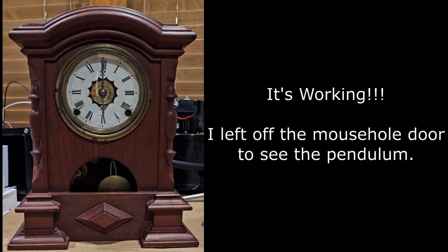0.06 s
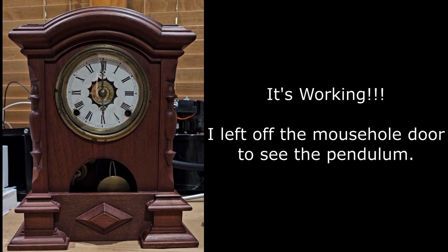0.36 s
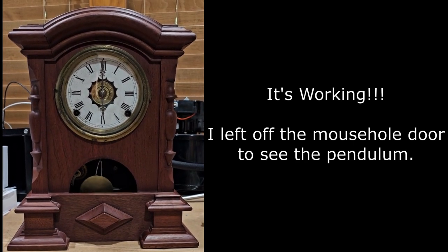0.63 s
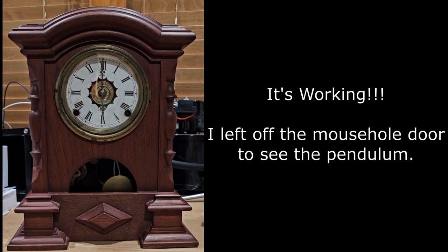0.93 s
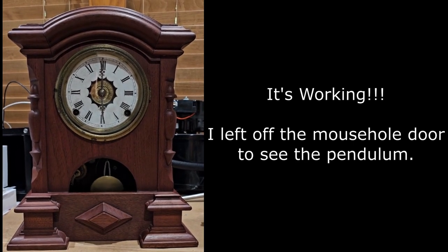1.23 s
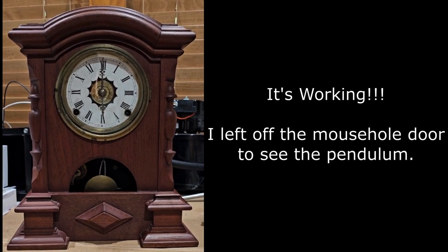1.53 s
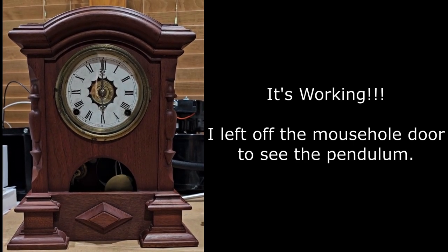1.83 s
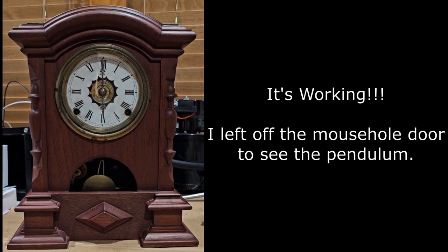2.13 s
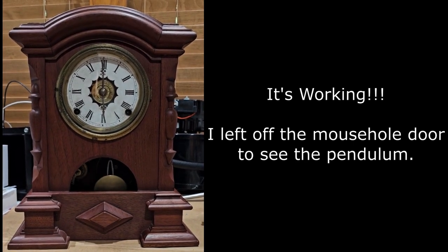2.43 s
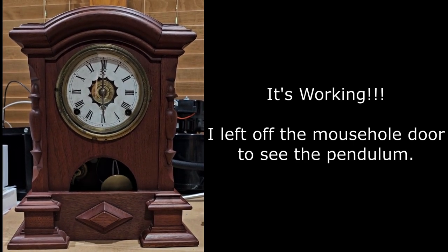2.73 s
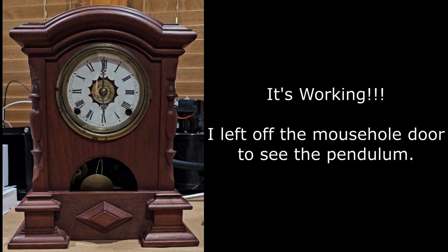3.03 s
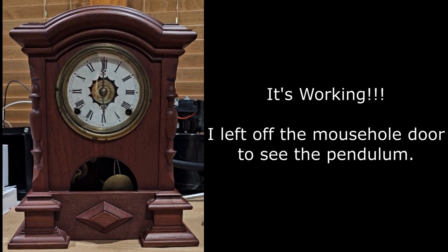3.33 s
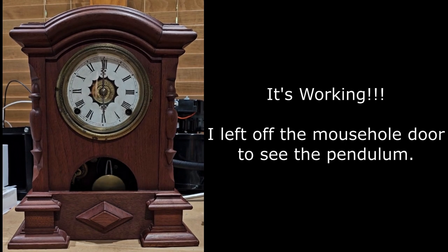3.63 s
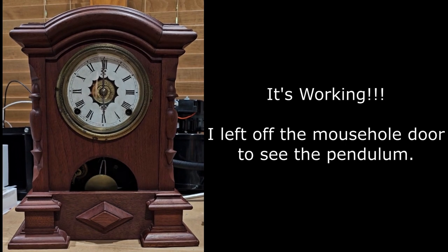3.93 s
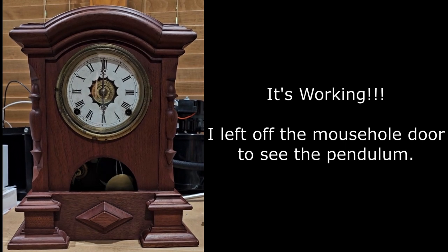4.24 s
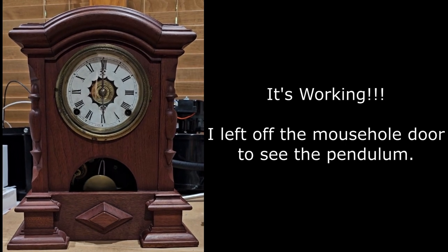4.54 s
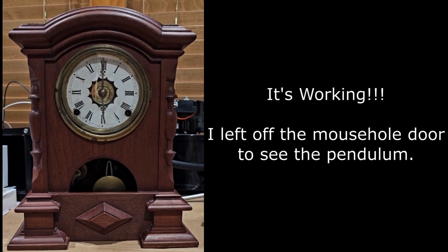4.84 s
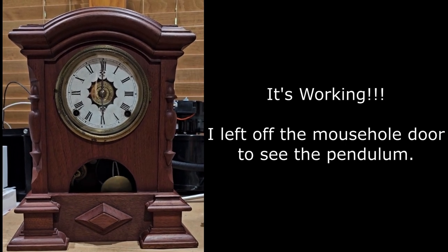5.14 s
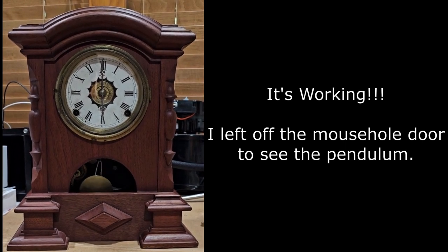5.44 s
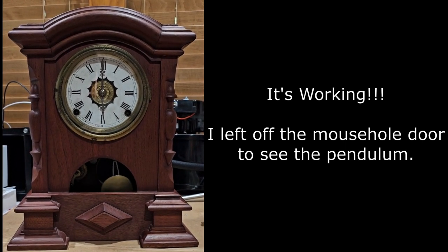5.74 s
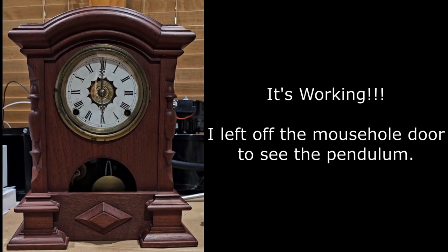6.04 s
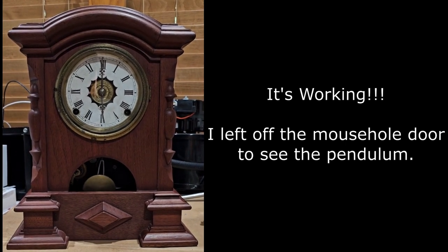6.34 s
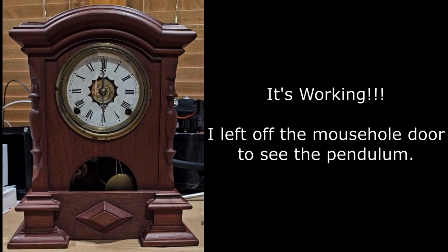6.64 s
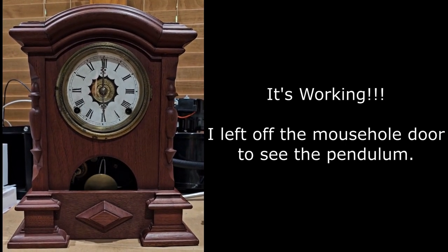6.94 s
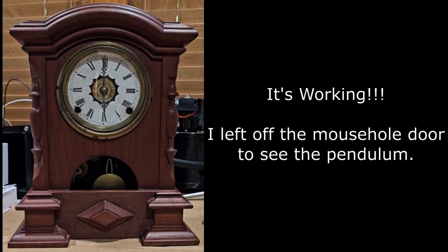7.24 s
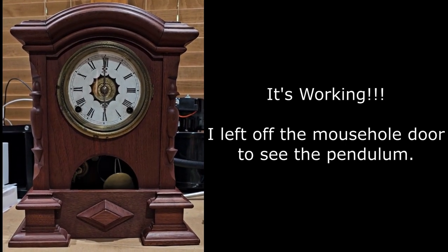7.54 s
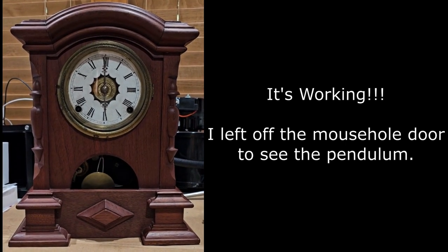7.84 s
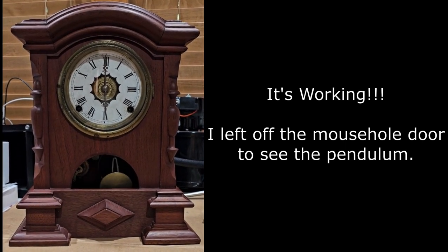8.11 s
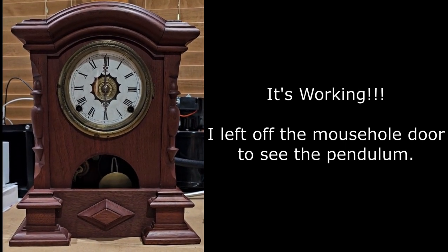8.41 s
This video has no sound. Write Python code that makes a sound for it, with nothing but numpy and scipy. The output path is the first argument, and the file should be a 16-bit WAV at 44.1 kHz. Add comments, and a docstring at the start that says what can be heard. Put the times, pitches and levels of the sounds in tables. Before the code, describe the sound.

Gears rattle and whir into motion inside a wooden mantel clock, heard up close over a faint room hush. Six evenly spaced strokes follow on a small, bright bell, each one with a woody knock. After the sixth, a short clatter ends the whirring, and the ring slowly fades. A quick, steady tick-tock runs underneath and carries on to the end.

```python
"""A quiet room, close to an antique wooden mantel clock that strikes six on a small bell.
The strike train spins up, gears and fan whirring. At each stroke the hammer knocks the case and
rings the bell; after the sixth, the train locks with a clatter. The pendulum's escapement
ticks throughout and goes on while the last stroke dies away."""
import sys
import numpy as np
from scipy import signal
from scipy.fft import rfft, irfft
from scipy.io import wavfile

SR = 44100
rng = np.random.default_rng(int(sys.argv[2]) if len(sys.argv) > 2 else 0)


def dump(signal):
    """Clip the signal to [-1, 1] and save it as 16-bit WAV at the path in sys.argv[1]."""
    limited = np.clip(np.atleast_2d(signal).T, -1, 1)
    pcm = np.round(limited * 32767).astype(np.int16)
    wavfile.write(sys.argv[1], SR, pcm)


N = 382345
PENDULUM_PERIOD_S, ROOM_T60_S = 0.803, 0.45


def amp(db):
    """Decibels to gain."""
    return 10 ** (np.asarray(db) / 20)


def decay(t, t60_s):
    """Envelope falling 60 dB in t60_s."""
    return 1e-3 ** (t / t60_s)


def lookup(table, hz):
    """Table value on a log-frequency axis."""
    table_hz, values = np.transpose(table)
    return np.interp(np.log(hz + 1), np.log(table_hz + 1), values)


def add(mix, start_s, sound):
    """Add a stereo sound to the mix at start_s."""
    part = mix[:, max(round(start_s * SR), 0):][:, :sound.shape[1]]
    part += sound[:, :part.shape[1]]


# Clock's stereo balance: (frequency [Hz], left minus right [dB])
BALANCE = [(100, 1), (200, -1), (380, -2), (700, 5), (1290, -3), (2380, -3), (4400, 3), (15000, 5.5)]

def pan_db(hz):
    """Left and right level offsets of the clock."""
    return np.outer([0.5, -0.5], lookup(BALANCE, hz))


# Wooden case and brass plates: (frequency [Hz], width [Hz], lift [dB])
CASE_RESONANCES = [(160, 22, 10.5), (225.5, 61, 11), (262, 14, 0), (320, 100, 9.5), (546, 98, 11),
                   (689.3, 117, 16), (744, 64, 12.5), (825, 40, 9), (1050, 10, 10), (1459, 53, 8),
                   (1613, 484, 14.5), (1840, 90, 2.5), (2101, 100, 13), (3980, 400, 5.5), (5500, 420, 7.5),
                   (7700, 810, -1.5), (11300, 510, -6)]
# Clock's stereo image: (frequency [Hz], left-right correlation [ratio])
CLOCK_CORRELATION = [(60, 1), (280, 1), (640, 0.75), (1400, 0.51), (3000, 0.23), (15000, 0.2)]

def noise_spectrum(spectrum, case_share, size, correlation=CLOCK_CORRELATION, ripple_db=3, ripple_hz=14):
    """Frequencies and stereo noise spectrum, coloured by the case and the room's standing waves."""
    hz = np.fft.rfftfreq(size, 1 / SR)
    left, independent = rfft(rng.standard_normal((2, size))) * np.sqrt(SR / 2)
    shared = lookup(correlation, hz)
    right = shared * left + np.sqrt(1 - shared ** 2) * independent
    lift_db = sum(db / (1 + (2 * (hz - centre) / width) ** 2) for centre, width, db in CASE_RESONANCES)
    ripple = np.interp(hz / ripple_hz, np.arange(len(hz)), rng.standard_normal(len(hz)))
    level_db = lookup(spectrum, hz) + case_share * lift_db + ripple_db * ripple + pan_db(hz)
    return hz, np.array([left, right]) * amp(level_db)


# Room air: (frequency [Hz], density [dB re 1/Hz])
AIR_SPECTRUM = [(20, -83.5), (60, -82.5), (120, -91.5), (250, -85), (380, -102), (520, -98.5), (800, -102),
                (1250, -101), (2000, -103), (3000, -110), (6000, -119), (9000, -130), (15500, -137)]
# Air's stereo image: (frequency [Hz], left-right correlation [ratio])
AIR_CORRELATION = [(60, 0.92), (280, 0.94), (640, 0.35), (1400, 0), (15000, 0)]

def room_air():
    """Steady low hush of the room."""
    _, noise = noise_spectrum(AIR_SPECTRUM, case_share=0, size=N, correlation=AIR_CORRELATION)
    return irfft(noise, N)


# Strike train, sagging as it lifts the hammer: (time [s], speed [teeth/s])
TRAIN_SPEED = [(0, 33.4), (.25, 26.8), (.45, 31.9), (1.1, 39.9), (1.6, 40.2), (2.3, 35.3), (2.7, 40.6),
               (3.4, 41.1), (3.85, 38.4), (4.3, 40.8), (4.95, 37.3)]

def train_motion(release_s=-0.06, spin_up_s=0.26, lock_s=5.13, coast_s=0.27, coast_db=-15, stop_s=0.04):
    """Teeth passed and gain of the train: it spins up, runs and locks; the fan slips on briefly."""
    t = np.arange(N) / SR
    speed = np.interp(t, *np.transpose(TRAIN_SPEED))
    speed_gain = amp(8.5 * np.log2(speed / 40))  # 8.5 dB per doubling
    spin_up = 1 - np.exp(-(t - release_s) / spin_up_s)
    running, coasting = (np.exp(-np.maximum(t - end, 0) / stop_s) for end in (lock_s, lock_s + coast_s))
    return np.cumsum(speed) / SR, speed_gain * spin_up * np.maximum(running, amp(coast_db) * coasting)


# Gears and fan before case colouring: (frequency [Hz], density [dB re 1/Hz])
WHIRR_SPECTRUM = [(50, -112), (120, -97.5), (200, -90), (450, -96), (1000, -89.5), (2000, -92), (2800, -93),
                  (4500, -93), (6500, -99), (10000, -105), (15500, -109)]

def train_whirr(teeth, gain, chatter_share=0.36, tooth_spread_db=2.6, split_hz=2400):
    """Gears and fan whirr through the case; each tooth sets off a short uneven rattle."""
    grain_db = 3 * np.interp(np.arange(N) / SR * 500, np.arange(N), rng.standard_normal(N))
    tooth_phase = teeth % 1
    contact = np.exp(-tooth_phase / 0.26) * (1 - np.exp(-tooth_phase / 0.08))
    chatter = contact * amp(tooth_spread_db * rng.standard_normal(N)[teeth.astype(int)] + grain_db)
    chatter_power = chatter ** 2 / np.mean(chatter ** 2)
    hz, noise = noise_spectrum(WHIRR_SPECTRUM, case_share=1, size=N)
    low = 1 / (1 + (hz / split_hz) ** 4)
    out = np.zeros((2, N))
    # Ringing wood smooths the low band's chatter.
    for band, share in ((low, 0.33 * chatter_share), (1 - low, chatter_share)):
        out += irfft(noise * band, N) * np.sqrt(1 - share + share * chatter_power)
    return out * gain


def blow(spectrum, t60s, rise_s, case_share, room_db, room_t60_s=ROOM_T60_S, size=24000):
    """A blow on the case: dense modes die band by band, and the room answers faintly."""
    hz, noise = noise_spectrum(spectrum, case_share, size)
    t, out = np.arange(size) / SR, np.zeros((2, size))
    centres_hz = np.geomspace(125, 16000, 8)
    for centre_hz, weights in zip(centres_hz, np.eye(len(centres_hz))):
        band = irfft(noise * np.interp(np.log(hz + 1), np.log(centres_hz), weights))
        direct = decay(t, lookup(t60s, centre_hz))
        reverb = amp(room_db) * decay(t, room_t60_s / (1 + centre_hz / 12000))
        attack = 1 - np.exp(-t / (rise_s + 1 / centre_hz))  # bass builds more slowly
        out += band * np.hypot(direct, reverb) * attack
    return out


# Tooth rattle decay: (frequency [Hz], t60 [s])
TOOTH_DECAY = [(200, 0.035), (1500, 0.043), (4000, 0.1), (14000, 0.058)]

def loose_teeth(teeth, gain, count=36, settle_s=0.51, fade_db_per_s=15):
    """Single teeth rattle while the train gathers speed, and fade as it settles."""
    out = np.zeros((2, N))
    for sample in np.flatnonzero(np.diff(np.floor(teeth)))[:count]:
        start_s = sample / SR
        db = 6 - fade_db_per_s * max(start_s - settle_s, 0) + rng.uniform(-1, 1)
        rattle = blow(WHIRR_SPECTRUM, TOOTH_DECAY, rise_s=0.003, case_share=0.99,
                      room_db=-27, room_t60_s=0.27, size=6000)
        add(out, start_s, gain[sample] * amp(db) * rattle)
    return out


# Wooden panels: (frequency [Hz], level [dB], t60 [s])
PANEL_MODES = [(176.6, -47, 0.61), (214.7, -37.5, 0.22), (270, -50.5, .25), (327, -43.5, .2),
               (642, -35.5, 0.17), (665, -36, 0.12), (836, -47.5, 0.27), (1057, -47, 0.28)]

def case_ring(hardness_hz, rise_s=0.0021, size=22000):
    """The struck panels ring; modes above hardness_hz are excited less."""
    t, out = np.arange(size) / SR, np.zeros((2, size))
    for hz, db, t60_s in PANEL_MODES:
        gain = amp(db + pan_db(hz)) / (1 + (hz / hardness_hz) ** 2)
        out += gain * np.sin(2 * np.pi * (hz * t + rng.random())) * decay(t, t60_s)
    return out * (1 - np.exp(-t / rise_s))


# Tick, light pallet touch, tock: (time in swing [s], click [dB], brass ring [dB], case thud [dB])
SWING_BEATS = [(0, -0.5, -0.3, -16), (0.332, -22.5, -12.5, -24.5), (0.405, -3, -18, -10.5)]
# Click before case colouring: (frequency [Hz], density [dB re 1/Hz])
CLICK_SPECTRUM = [(50, -115), (200, -88.5), (450, -92), (800, -91.5), (1200, -90), (2500, -81.5),
                  (4500, -96), (6500, -100), (10000, -107), (15500, -113)]
# Click decay: (frequency [Hz], t60 [s])
CLICK_DECAY = [(200, 0.38), (700, 0.25), (2000, 0.098), (5000, 0.097), (14000, 0.13)]
# Brass rung by a beat: (frequency [Hz], level [dB], t60 [s], delay [s])
BRASS_MODES = [(775, -38.5, 0.087, .001), (1710, -46.5, 0.055, .002), (2030, -46.5, 0.088, .009),
               (5475, -51, 0.055, 0.011), (7490, -62, .03, .001), (8550, -59, .04, .010),
               (10900, -63, 0.026, .009)]

def escapement(first_tick_s=0.527, force_spread_db=1.1):
    """Teeth land on the pallets each swing: one rings the brass more, the other thuds in the wood."""
    t, out = np.arange(SR // 5) / SR, np.zeros((2, N))
    brass_attack = 1 - np.exp(-t / 0.0028)
    swings_s = np.arange(first_tick_s - PENDULUM_PERIOD_S, N / SR, PENDULUM_PERIOD_S)
    beats = [(swing_s + offset_s, *levels) for swing_s in swings_s for offset_s, *levels in SWING_BEATS
             if 0 < swing_s + offset_s < N / SR]
    for start_s, click_db, ring_db, thud_db in beats:
        force = amp(force_spread_db * rng.standard_normal())
        click = blow(CLICK_SPECTRUM, CLICK_DECAY, rise_s=0.00089, case_share=0.811, room_db=-11)
        add(out, start_s, force * amp(click_db) * click)
        add(out, start_s, force * amp(thud_db) * case_ring(hardness_hz=450))
        for hz, mode_db, t60_s, delay_s in BRASS_MODES:
            gain = amp(mode_db + ring_db + rng.standard_normal() + pan_db(hz))
            ring = np.sin(2 * np.pi * hz * t) * decay(t, t60_s) * brass_attack
            add(out, start_s + delay_s, force * gain * ring)
    return out


# Lever drops and hammer bounces: (time [s], level [dB], rise [s], case thump re level [dB])
MECHANISM_CLACKS = [(0.560, -13, .002, 1), (1.130, -17, 0.0019, 0), (1.184, -17.5, .002, 0),
                    (5.013, -5, .004, 0.5), (5.031, 2.5, 0.0019, 1), (5.046, -6.5, 0.0012, 2),
                    (5.101, -24, 0.0027, 1), (5.171, -19, 0.0009, -6), (5.241, -7, 0.0012, 6),
                    (5.392, -20, .003, 5.5)]
# Clack before case colouring: (frequency [Hz], density [dB re 1/Hz])
CLACK_SPECTRUM = [(50, -105), (130, -83), (250, -71.5), (500, -75), (750, -77.5), (1500, -72.5),
                  (2800, -71.5), (4500, -78.5), (7500, -79), (11000, -79), (15500, -92)]
# Clack decay: (frequency [Hz], t60 [s])
CLACK_DECAY = [(150, 0.39), (700, 0.12), (2500, 0.29), (14000, 0.076)]

def mechanism_clacks():
    """Levers and the rebounding hammer clack and thump the case."""
    out = np.zeros((2, N))
    for start_s, db, rise_s, thump_db in MECHANISM_CLACKS:
        clack = blow(CLACK_SPECTRUM, CLACK_DECAY, rise_s, case_share=0.67, room_db=-17)
        add(out, start_s, amp(db) * clack)
        add(out, start_s, amp(db + thump_db) * case_ring(hardness_hz=1494))
    return out


# Strokes: (time [s], knock [dB], bell ring [dB], tilt above prime [dB/octave], twin partial [dB])
HAMMER_STROKES = [(0.8906, 2, -1.96, 4, -0.5), (1.7070, 1.7, 0.1, 0.64, -2), (2.5580, 3, -1.14, 2, 4.5),
                  (3.3535, 3, -2, 3.5, 6.5), (4.1557, 3, -3.5, 4.4, 1), (4.9710, 2, 0.68, -0.8, -1.5)]
# Knock before case colouring: (frequency [Hz], density [dB re 1/Hz])
KNOCK_SPECTRUM = [(50, -100), (130, -66), (220, -66), (480, -70.5), (750, -70), (1200, -73.5),
                  (2500, -75.5), (4500, -64.5), (7500, -63), (11000, -68), (15500, -70.5)]
# Knock decay: (frequency [Hz], t60 [s])
KNOCK_DECAY = [(150, .25), (400, 0.14), (800, 0.2), (2000, 0.14), (5000, 0.017), (14000, 0.052)]

def hammer():
    """The hammer jolts the case at each stroke."""
    out = np.zeros((2, N))
    for start_s, db, *_ in HAMMER_STROKES:
        knock = blow(KNOCK_SPECTRUM, KNOCK_DECAY, rise_s=0.0005, case_share=0.4, room_db=-27)
        add(out, start_s, amp(db) * knock)
        add(out, start_s, amp(db) * case_ring(hardness_hz=2990))
    return out


# Bell: (frequency [Hz], left [dB], right [dB], t60 [s], left phase lead [rad], pendulum sway [dB])
BELL_MODES = [(1408.5, -53, -51, 8, -2.8, 0), (1426, -52, -44.3, 7.5, .9, .5), (1429, -29, -29, .26, .5, 0),
              (3493.1, -26.6, -27, 6.2, -.2, 1.0), (3564.2, -42, -49, 6, -.15, .8),
              (6264.6, -32, -38.5, 1.5, 1.8, 1), (6359.8, -18.2, -20.2, 1.55, 2.15, 2.4),
              (6988, -66, -68, 3, 0, 0), (9487, -43, -48, .55, 0, 0), (9568, -38, -43, .6, 0, 0),
              (9648, -29.5, -38, 1, 1.1, 2), (9655, -18, -25, .15, 0, 0),
              (9699.5, -22, -39.5, .96, -2.2, 1), (9851, -48, -54, .6, 0, 0),
              (12718, -43.5, -48.5, .65, -2.8, 1), (13542, -18.5, -23, .35, -.9, 3),
              (13640, -32, -34, .17, 1.5, 0)]

def bell_partials(t, start_s, ring_db, tilt_db, twin_db, prime_hz=3493.1, twin_hz=3564.2):
    """One stroke's partials, swayed by the pendulum; a weaker twin beats against the prime."""
    sway = np.cos(2 * np.pi * 2 * (start_s + t - 1.071) / PENDULUM_PERIOD_S)  # twice per period
    ring = np.zeros((2, len(t)))
    for hz, left_db, right_db, t60_s, lead_rad, sway_db in BELL_MODES:
        stroke_db = ring_db + tilt_db * max(np.log2(hz / prime_hz), 0) + twin_db * (hz == twin_hz)
        phase = 2 * np.pi * (hz * t + rng.random())
        waver = np.array([np.interp(20 * t, np.arange(128), ear) for ear in rng.standard_normal((2, 128))])
        waver_db = 0.45 * hz / prime_hz * waver  # short waves waver most
        envelope = amp(stroke_db + sway_db * sway + waver_db) * decay(t, t60_s)
        left, right = amp(left_db) * np.sin(phase + lead_rad), amp(right_db) * np.sin(phase)
        ring += envelope * np.array([left, right])
    return ring


def bell(attack_s=0.0016, swell_share=0.15, swell_s=0.06, onset_s=0.0033, scatter_db=-7):
    """Each stroke replaces the old ring; its sudden onset scatters round the case and room."""
    out, onsets = np.zeros((2, N)), np.zeros((2, N))
    ends_s = [stroke[0] for stroke in HAMMER_STROKES[1:]] + [N / SR + 1]
    for (start_s, _, ring_db, tilt_db, twin_db), end_s in zip(HAMMER_STROKES, ends_s):
        t = np.arange(round((end_s - start_s + 0.0174) * SR)) / SR
        attack = 1 - np.exp(-(t / attack_s) ** 2)
        room_swell = 1 - swell_share * np.exp(-t / swell_s)
        release = np.exp(-np.maximum(start_s + t - end_s, 0) / 0.009)
        ring = bell_partials(t, start_s, ring_db, tilt_db, twin_db) * attack * room_swell * release
        add(out, start_s, ring)
        add(onsets, start_s, ring * np.exp(-t / onset_s))
    return out + amp(scatter_db) * reflections(onsets)


def reflections(sound, size=20000):
    """Diffuse room reflections of about unit energy, different at each ear."""
    tail = rng.standard_normal((2, size)) * decay(np.arange(size) / SR, ROOM_T60_S)
    return signal.oaconvolve(sound, tail / np.linalg.norm(tail[0]), axes=1)[:, :sound.shape[1]]


def scene(right_delay_s=0.00026):
    """The clock, a little nearer the left ear, over the room's air."""
    air = room_air()
    teeth, gain = train_motion()
    impacts = hammer() + mechanism_clacks() + escapement()
    left, right = impacts + loose_teeth(teeth, gain) + train_whirr(teeth, gain)
    delayed_right = np.pad(right, (round(right_delay_s * SR), 0))[:N]
    return air + np.array([left, delayed_right]) + bell()


def record(dry, cutoff_hz=16100):
    """Steep low-pass on the top treble."""
    lowpass = signal.firwin(255, cutoff_hz, window=("kaiser", 9), fs=SR)
    return signal.oaconvolve(dry, lowpass[None], "same", axes=1)


dry = scene()
out = record(dry)
dump(out)
```